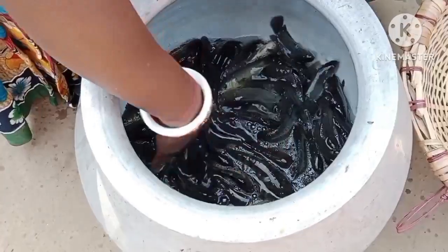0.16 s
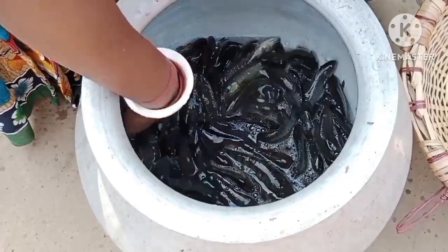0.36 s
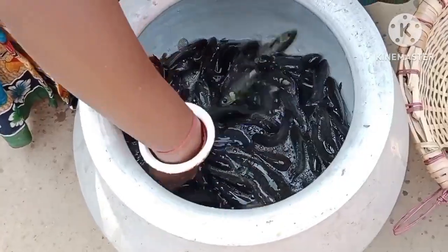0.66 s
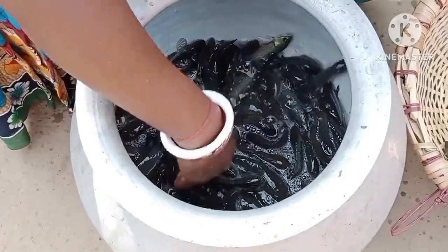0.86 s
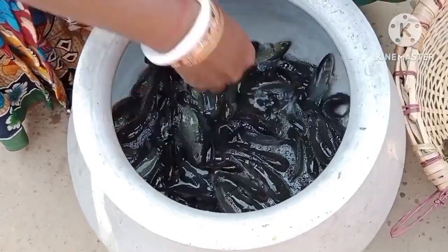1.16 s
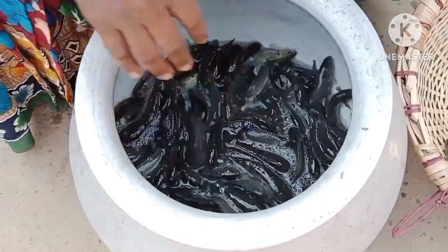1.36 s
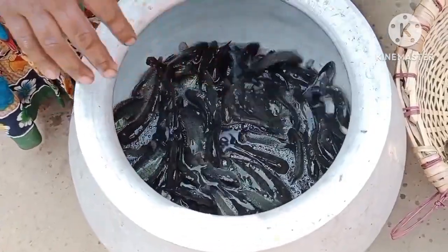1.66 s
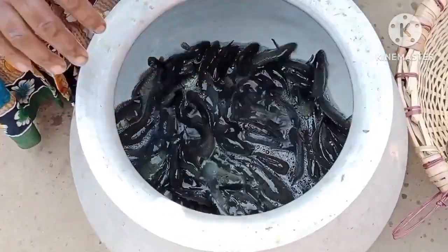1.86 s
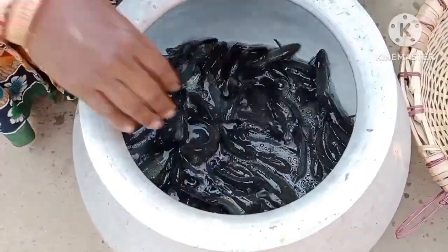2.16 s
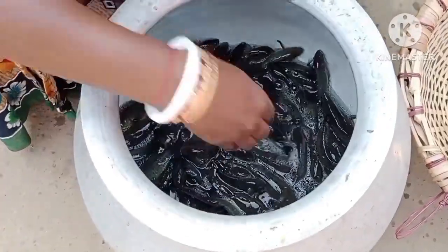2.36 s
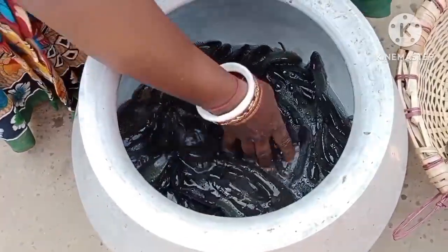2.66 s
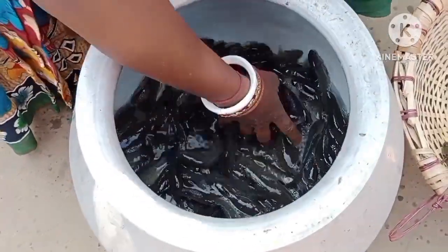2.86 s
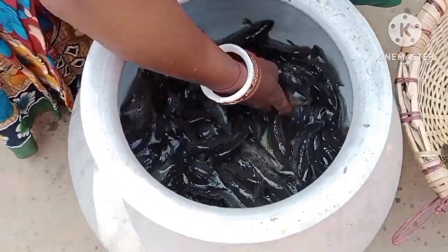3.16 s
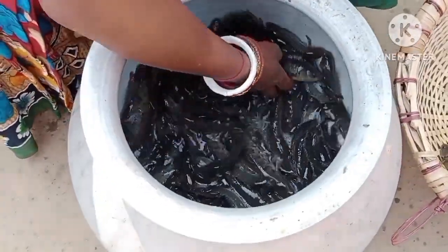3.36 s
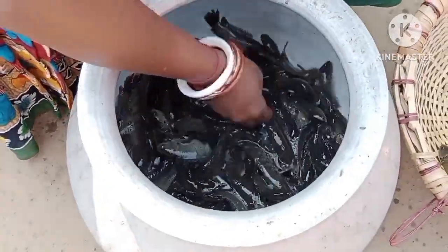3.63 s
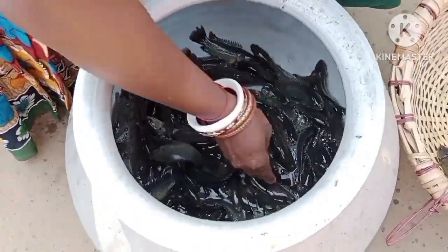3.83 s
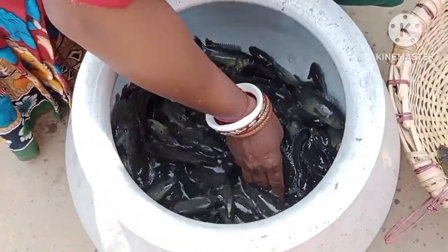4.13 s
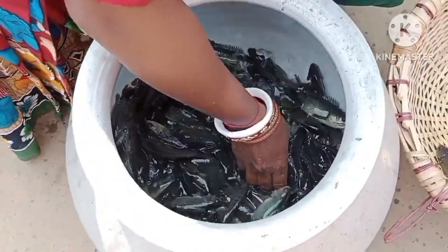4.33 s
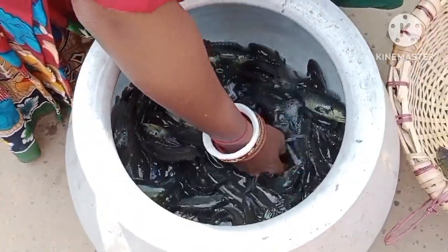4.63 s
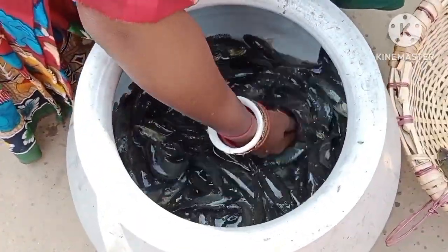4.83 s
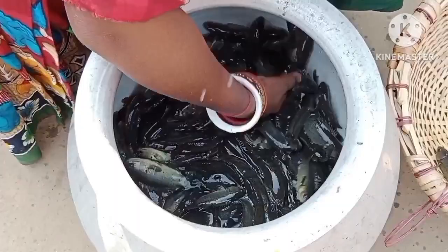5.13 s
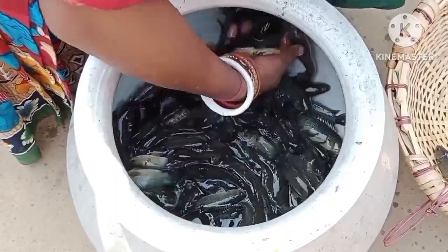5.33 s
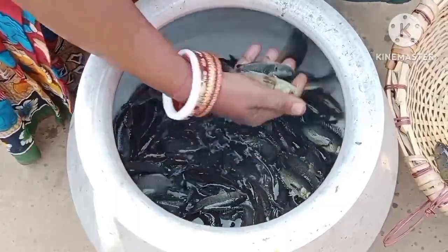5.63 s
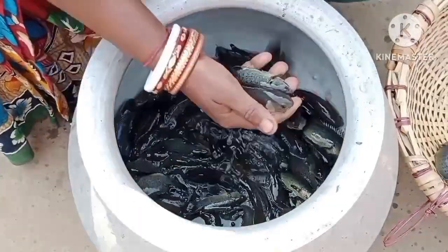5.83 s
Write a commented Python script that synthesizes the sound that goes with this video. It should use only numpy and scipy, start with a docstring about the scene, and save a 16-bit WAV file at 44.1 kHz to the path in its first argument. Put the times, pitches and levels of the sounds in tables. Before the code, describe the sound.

Close wet thrashing of fish in a metal pot: bubbly surges, sharp spray ticks and near-silent gaps, plus a single ringing knock near the start.

```python
"""A burst of gurgle and fizz comes first, one hard knock on metal at half a second, then more surges.
Place: outdoors, close above a metal pot where a hand gropes among live fish packed in shallow water.
Bubbles are chirped sines with noise, spray is ringing grains and hiss, the wall is a bank of decaying modes.
Behind them lie a faint shaped-noise hush and a low rumble.
The microphone is noise-suppressed and nearly mono, with a notch near 4 kHz and little above 8 kHz."""
import sys
import numpy as np
from scipy import signal
from scipy.fft import rfft, irfft
from scipy.io import wavfile
from scipy.ndimage import uniform_filter1d

SR = 44100
rng = np.random.default_rng(int(sys.argv[2]) if len(sys.argv) > 2 else 0)


def put_to_file(sound):
    """Save the sound as 16-bit audio at rate SR, in the file named by the first command-line argument."""
    columns = np.atleast_2d(sound).T  # one column per channel
    safe = np.clip(columns, -1, 1)
    whole_steps = np.round(safe * 32767)
    wavfile.write(sys.argv[1], SR, whole_steps.astype(np.int16))


N = 264159     # length in samples


def from_db(db):
    """Decibels to amplitude gain."""
    return 10 ** (np.asarray(db) / 20)


def rms_one(x):
    """Scale a signal to rms 1."""
    return x / np.sqrt(np.mean(x ** 2) + 1e-20)


def band(x, low_hz, high_hz):
    """Band-pass between two frequencies."""
    return signal.sosfilt(signal.butter(2, [low_hz, high_hz], "band", fs=SR, output="sos"), x)


def high_pass(x, order, hz):
    """Remove what lies below a frequency."""
    return signal.sosfilt(signal.butter(order, hz, "high", fs=SR, output="sos"), x)


def noise_band(length, low_hz, high_hz):
    """Band-passed white noise of rms 1."""
    return rms_one(band(rng.standard_normal(length), low_hz, high_hz))


def drift(rate_hz):
    """Slow random wandering of rms 1: white noise through two equal low-pass poles."""
    pole = np.exp(-2 * np.pi * rate_hz / SR)
    noise = rng.standard_normal(N + SR)
    # the first second lets the filter settle
    return rms_one(signal.lfilter([1], [1, -2 * pole, pole * pole], noise)[SR:])


def ring(drive, hz, t60):
    """A damped resonator: a unit click sets a sine of height 1 ringing."""
    radius = from_db(-60 / (t60 * SR))
    angle = 2 * np.pi * hz / SR
    poles = [1, -2 * radius * np.cos(angle), radius * radius]
    return signal.lfilter([0, np.sin(angle)], poles, drive + 1e-18)


def bursts(rows, rise, tone, octaves, attack_cycles, crack_db):
    """Each row: a tone whose pitch may climb as it dies, torn noise around that pitch, and a broad crack."""
    out, t = np.zeros(N + SR), np.arange(SR // 5) / SR
    noise = rng.standard_normal((len(rows), 2, len(t)))
    climbs = np.broadcast_to(rise, len(rows))     # pitch climb per t60, as a share of the start pitch
    for (s, peak_db, hz, t60), climb, (torn_noise, crack_noise) in zip(rows, climbs, noise):
        t60 = np.clip(t60, .006, .3)
        chirp = np.sin(2 * np.pi * hz * (t + climb * t * t / t60 / 2))
        low, high = hz / 2 ** octaves, min(hz * 2 ** octaves, 18000)
        torn = rms_one(band(band(torn_noise, low, high), low, high))
        attack = 1 - np.exp(-(t * hz / attack_cycles) ** 2)
        shape = attack * from_db(-60 * t / t60)
        crack_shape = (1 - np.exp(-t / .0007)) * np.exp(-t / .002)
        crack = from_db(crack_db) * band(crack_noise, hz / 2, 16000) * crack_shape
        share = np.clip(tone, 0, 1)
        at = round((s - attack_cycles / hz / 2) * SR)     # start early: the swell is under way at the given time
        out[at:at + len(t)] += from_db(peak_db) * (shape * (share * chirp + (1 - share) * torn) + crack)
    return out[:N]


def grains(per_s, low_hz, high_hz, cycles, spread_db, tilt_db, patch_db):
    """Many small bubbles ring at random moments; each size has busy spells; tilt is per octave; rms 1."""
    sizes = from_db(spread_db * np.minimum(rng.exponential(1, N), 4)) * rng.choice([-1, 1], N)
    born = rng.random(N) < per_s / SR
    pitches = np.geomspace(low_hz, high_hz, 20)
    dealt = rng.integers(0, 20, N)     # which pitch a bubble gets
    spells = drift(8.1)
    middle_hz = np.sqrt(low_hz * high_hz)
    out = np.zeros(N)
    for k, hz in enumerate(pitches):
        spell_db = patch_db * np.roll(spells, k * N // 20)
        busy = from_db(spell_db + tilt_db * np.log2(hz / middle_hz))
        clicks = sizes * born * busy * (dealt == k)
        out += band(ring(clicks, hz, cycles / hz), hz / 1.6, hz * 1.35)
    return rms_one(out)


def swells(rows, waver):
    """Tones that swell and fade, wavering in pitch and strength."""
    t, out = np.arange(N) / SR, np.zeros(N)
    wobble, flutter = np.cumsum(drift(24)) / SR, drift(58)
    for (s, peak_db, hz, length), phase in zip(rows, rng.uniform(0, 2 * np.pi, len(rows))):
        spread = length * np.where(t < s, .6, 1.2)     # quicker in than out
        shape = np.exp(-2 * ((t - s) / spread) ** 2)
        out += from_db(peak_db) * shape * np.sin(2 * np.pi * hz * (t + waver * wobble) + phase)
    return out * from_db(3.5 * flutter)


def cavity(x, t60, lags_s):
    """A few short feedback delays in parallel, of alternating sign: dense early echoes."""
    w = 2 * np.pi * np.fft.rfftfreq(N + SR, 1 / SR)
    echoes = 0
    for k, lag in enumerate(lags_s):
        one_trip = from_db(-60 * lag / t60) * np.exp(-1j * w * lag)
        echoes = echoes + (-1) ** k * (1 / (1 - one_trip) - 1)     # only the echoes, not the direct sound
    return irfft(rfft(x, N + SR) * echoes, N + SR)[:N]


# colour of the outdoor air: (frequency [Hz], density [dB per Hz, relative])
HUSH_COLOUR = [(18, -36.5), (30, -33.5), (119, 15), (881, -8), (1970, -2.5), (3680, -18.5), (4300, -13),
               (7240, -19.5), (8920, 0.5), (15000, -33.5)]


def hush():
    """Faint outdoor hush: noise shaped in frequency, its level wandering slowly."""
    hz, points = np.fft.rfftfreq(N, 1 / SR) + 1, np.array(HUSH_COLOUR)
    colour = from_db(np.interp(np.log(hz), np.log(points[:, 0]), points[:, 1]))
    air = rms_one(irfft(rfft(rng.standard_normal(N)) * colour, N))
    return from_db(-63.5 + 2 * drift(3.8)) * air


def rumble():
    """Far-off outdoor rumble: low noise with a wavering level."""
    return from_db(-70.5 + 1.4 * drift(20)) * noise_band(N, 48, 110)


# low lurches of the whole water mass: (time of the middle [s], level before flutter [dB], pitch [Hz])
LURCH_ROWS = [(0.022, -48.5, 130), (1.8, -46, 75), (2.118, -50, 80), (3.513, -60, 69), (3.87, -47.5, 53.3),
              (4.077, -43, 70.5), (4.792, -48, 66.4), (5.651, -51.5, 121), (5.792, -53, 85)]


def lurches():
    """The whole water mass heaves: brief low tones of strongly wavering pitch."""
    return swells([(*row, .05) for row in LURCH_ROWS], waver=0.14)     # length scale .05 s


# the wall rubbed by moving water:
# (time of the middle [s], level before flutter [dB], pitch [Hz], length scale [s])
WALL_TONE_ROWS = [(0.09, -45.5, 618, 0.074), (0.53, -29, 242, 0.027), (1.11, -57, 626, 0.048),
                  (1.39, -48, 618, 0.028), (1.88, -45, 634, 0.05), (2.165, -38.5, 625, 0.072),
                  (2.79, -59, 727, 0.054), (2.93, -59.5, 620, 0.11), (3.07, -53, 603, 0.13),
                  (3.19, -50.5, 713, 0.071), (3.32, -58, 967, 0.066), (3.56, -47.5, 623, 0.18),
                  (3.585, -28.5, 938, 0.035), (3.72, -51.5, 720, 0.11), (3.98, -51.5, 603, 0.15),
                  (4.2, -55.5, 1550, 0.21), (4.61, -49, 609, 0.059), (4.68, -57.5, 699, 0.41),
                  (5.07, -42.5, 605, 0.13), (5.28, -53.5, 586, 0.61), (5.37, -47.5, 1040, 0.4),
                  (5.43, -44, 678, 0.12), (5.6, -47.5, 1095, 0.19), (5.62, -48.5, 617, 0.2)]


def wall_tones():
    """The wall sings briefly where moving water rubs it: swelling tones of nearly steady pitch."""
    return swells(WALL_TONE_ROWS, waver=0.012)


# hard knocks on the wall of the pot: (time [s], level of the blow [dB])
KNOCK_ROWS = [(0.475, -0.5)]
# ringing modes of the wall: (frequency [Hz], level relative to the blow [dB], t60 [s])
WALL_MODES = [(244, -31, .2), (430, -39, .6), (628, -23, .3), (856, -34.5, 2.0), (972, -26, .22),
              (1205, -16.5, .4), (1436, -15.5, .45), (1723, -20, .16), (1855, -4, .19), (1950, -5, .21),
              (2030, -27, .35), (2266, -24, .26), (2460, -23, .33), (2649, -25, .33), (2864, -22, .2),
              (3332, -26, .26), (3515, -27, .22)]
RING_STOP_S = .72     # sloshing water stills the wall this long after a blow


def knocks():
    """A blow reaches every wall mode within a millisecond or two and shakes loose a clatter that dies fast."""
    out, t = np.zeros(N), np.arange(SR // 3) / SR
    sway = drift(8.6)     # sloshing water lets each mode swell and sink
    for s, blow_db in KNOCK_ROWS:
        at = round(s * SR)
        stilled = from_db(-500 * np.maximum(np.arange(N) / SR - s - RING_STOP_S, 0))
        delays = rng.integers(0, 60, len(WALL_MODES))     # samples
        for k, ((hz, level_db, t60), late) in enumerate(zip(WALL_MODES, delays)):
            drive = np.zeros(N)
            drive[at + late] = from_db(blow_db + level_db)
            mode_sway = from_db(2.2 * np.roll(sway, k * N // len(WALL_MODES)))
            out += stilled * mode_sway * ring(drive, hz, t60)
        clatter = noise_band(len(t), 1600, 3800)
        out[at:at + len(t)] += from_db(blow_db - 9.5 - 60 * t / 0.17) * clatter
        thud = noise_band(len(t), 300, 1000)     # the water shaken with the wall
        out[at:at + len(t)] += from_db(blow_db - 27 - 60 * t / 0.22) * thud
    return out


# surges of thrashing fish and stirring hand:
# (start time [s], hold [s], gurgle level [dB], fizz level [dB])
SURGE_ROWS = [(0.0, 0.0022, -23.5, -24), (0.027, 0.035, -31, -30), (0.136, 0.037, -41.5, -39.5),
              (0.342, 0.017, -48, -55.5), (0.403, 0.0046, -54, -45.5), (0.479, 0.08, -27.5, -46),
              (0.585, 0.18, -58, -56.5), (0.812, 0.032, -45, -45.5), (1.038, 0.073, -53, -47),
              (1.246, 0.031, -61, -59), (1.326, 0.026, -39, -34.5), (1.418, 0.07, -61.5, -69),
              (1.543, 0.16, -61.5, -56), (1.79, 0.078, -27, -24.5), (2.067, 0.063, -22.5, -25.5),
              (2.005, 0.034, -50, -41.5), (2.195, 0.05, -44, -46), (2.414, 0.025, -70.5, -62.5),
              (2.797, 0.0093, -50, -52.5), (2.901, 0.039, -40.5, -48.5), (3.027, 0.18, -46, -62),
              (3.142, 0.08, -49, -47), (3.495, 0.075, -26, -29), (3.772, 0.064, -37.5, -35),
              (3.913, 0.0066, -31, -34), (3.961, 0.005, -23.5, -25.5), (4.084, 0.12, -56.5, -43.5),
              (4.222, 0.086, -48, -49), (4.29, 0.02, -49, -49.5), (4.418, 0.015, -51, -66),
              (4.524, 0.016, -33.5, -38.5), (4.756, 0.027, -50.5, -61.5), (4.883, 0.18, -55.5, -60.5),
              (5.006, 0.04, -29.5, -36.5), (5.088, 0.073, -28, -28), (5.236, 0.13, -32.5, -40.5),
              (5.447, 0.17, -34, -46.5), (5.671, 0.099, -30.5, -35.5), (5.81, 0.21, -43, -56.5)]
CALM_GURGLE_DB, CALM_FIZZ_DB = -69.5, -68     # still water between surges
SWELL_DB_PER_S = 1592     # how fast a surge builds before its start
GURGLE_SETTLE_DB_PER_S, FIZZ_SETTLE_DB_PER_S = 188.5, 240.5     # how fast it dies after its hold


def surging():
    """Gurgle and fizz levels in dB: each surge builds fast, holds and settles; the strongest one counts."""
    t = np.arange(0, N / SR + .002, .001)
    s, hold, gurgle_db, fizz_db = np.array(SURGE_ROWS).T[:, :, None]
    early_db = SWELL_DB_PER_S * np.maximum(s - t, 0)
    late = np.maximum(t - s - hold, 0)
    gurgle_db = (gurgle_db - early_db - GURGLE_SETTLE_DB_PER_S * late).max(0)
    fizz_db = (fizz_db - early_db - FIZZ_SETTLE_DB_PER_S * late).max(0)
    gurgle_db = np.maximum(gurgle_db, CALM_GURGLE_DB)
    fizz_db = np.maximum(fizz_db, CALM_FIZZ_DB)
    return [np.interp(np.arange(N) / SR, t, db) for db in (gurgle_db, fizz_db)]


def slosh(gurgle_db):
    """Dull weight of the displaced water: low noise that follows the smoothed gurgle level."""
    level_db = uniform_filter1d(gurgle_db, size=1500) - 28 + 3.6 * drift(32)
    return from_db(level_db) * noise_band(N, 180, 520)


def fizz(fizz_db, flicks):
    """Fine spray: tiny high bubbles ring over a hiss of drops too fine to ring."""
    tiny = grains(1900, 4300, 8600, cycles=110, spread_db=2.5, tilt_db=1.5, patch_db=5.5)
    mist = from_db(-3.5 + 2.0 * flicks + 2.0 * drift(31)) * noise_band(N, 7200, 11500)
    return from_db(fizz_db + 3.5 * flicks) * (tiny + mist)


# colour of the gurgle, darkest at the end as the hand churns deeper: (time [s], tilt [dB per octave])
GURGLE_TILT_POINTS = [(0, 11), (2.6, 9), (2.802, 11), (3.298, 11.5), (3.448, 9.5), (4.951, 13), (5.202, 6),
                      (5.99, 6)]


def gurgle(gurgle_db, flicks):
    """Churned water: thousands of small bubbles a second, each a damped ring, with a moving spectral tilt."""
    tilt_db = np.interp(np.arange(N) / SR, *np.transpose(GURGLE_TILT_POINTS))
    bubbles = grains(5000, 950, 3850, cycles=80, spread_db=3.0, patch_db=5.5, tilt_db=tilt_db)
    return from_db(gurgle_db + 2.0 * flicks) * bubbles


# clear short tones, some steady, some climbing in pitch:
# (time [s], level [dB], start pitch [Hz], t60 before limiting to .006-.3 [s], climb per t60 [share of pitch])
CLEAR_TONE_ROWS = [(0.825, -33, 2370, 0.071, 0), (0.902, -9, 2320, 0.023, 1.96),
                   (0.907, -20, 2960, 0.03, 0), (1, -39.5, 2470, .12, 0.23), (1.047, -41, 2350, 0.11, 0),
                   (1.198, -41.5, 3560, 0.22, 0.23), (1.247, -44.5, 3765, 0.68, 0),
                   (1.255, -45.5, 5450, 0.16, 0), (2.869, -27, 1380, 0.046, 0.87),
                   (3.262, -39, 1650, 0.06, 0.075), (4.395, -19.5, 1540, 0.12, 0),
                   (4.397, -15.5, 1860, 0.04, 1.4), (4.486, -20.5, 1531, 0.32, 0),
                   (4.599, -17, 2460, 0.019, 1.2), (4.646, -16.5, 1523, 0.051, 0.17),
                   (5.578, -22, 3220, 0.037, 0.86), (5.773, -20.5, 3400, 0.026, 0.49)]


def clear_tones():
    """Clear short tones, some steady, some climbing in pitch: decaying sines with a little narrow noise."""
    return bursts([row[:4] for row in CLEAR_TONE_ROWS], rise=[row[4] for row in CLEAR_TONE_ROWS],
                  tone=.65, octaves=.12, attack_cycles=4.0, crack_db=-34.0)


# spray thrown off: (time [s], level [dB], centre frequency [Hz])
SPRAY_ROWS = [(0.0733, 3, 7220), (0.4473, -6.5, 9040), (0.4773, -20, 6000), (0.607, -24, 8600),
              (0.649, -27.5, 7960), (0.8265, -21.5, 6860), (0.949, -24.5, 7050), (1.084, -14, 7080),
              (1.363, -5, 7170), (1.557, -19, 6450), (1.621, -23.5, 4320), (1.768, -24, 6800),
              (1.8109, -9.5, 6900), (1.843, -6, 5500), (2.0492, -6.5, 6700), (2.065, -2, 7350),
              (2.453, -36.5, 6100), (2.796, -28, 5350), (2.8542, -25.5, 6440), (2.9254, -7.5, 8100),
              (3.0673, -22.5, 7950), (3.105, -12, 6770), (3.4423, -20.5, 9220), (3.488, -6.5, 7660),
              (3.5673, -4.5, 6680), (3.7798, -19, 5100), (3.7788, -9.5, 8100), (3.7997, -13.5, 4970),
              (3.962, -9.5, 6150), (3.983, -7.5, 7150), (4.007, -5, 6700), (4.2373, -21, 5840),
              (4.2557, -21, 6270), (4.311, -23.5, 5960), (4.336, -17.5, 5920), (4.348, -16, 4900),
              (4.442, -24, 6000), (4.524, -17.5, 7170), (4.5499, -10, 7830), (4.6, -21, 6970),
              (4.645, -25, 4600), (4.66, -33, 10600), (4.7768, -16.5, 6190), (4.9427, -24.5, 5550),
              (4.997, -12, 5480), (4.995, -9.5, 10140), (5.0053, -2, 4950), (5.1, -7.5, 5720),
              (5.1673, -7.5, 6380), (5.35, -14, 5740), (5.511, -10, 4640), (5.699, -6, 6660),
              (5.773, -12, 8600), (5.9436, -11, 8260)]


def spray():
    """Thrown spray ticks: short high bursts, more torn noise than tone, with a strong crack."""
    return bursts([(*row, .022) for row in SPRAY_ROWS],     # t60 .022 s
                  rise=0.044, tone=0.4, octaves=0.36, attack_cycles=7.0, crack_db=-13)


# air pockets closed by tail slaps and the hand:
# (time [s], level [dB], start pitch [Hz], t60 before limiting to .006-.3 [s])
PLOP_ROWS = [(0.0322, -6.5, 2670, 0.022), (0.073, -19, 1202, 0.065), (0.074, -8.5, 3900, 0.022),
             (0.1712, -26, 3810, 0.12), (0.1897, -24, 2670, 0.074), (0.3513, -16, 2540, 0.022),
             (0.412, -29, 2250, 0.1), (0.4746, -16, 3070, 0.051), (0.482, -7, 1970, 0.058),
             (0.562, -13, 1942, 0.087), (0.796, -26.5, 1300, 0.089), (0.8454, -13.5, 3350, 0.034),
             (0.888, -31.5, 1220, 0.15), (0.9198, -6, 3355, 0.032), (1.0416, -29.5, 3510, 0.075),
             (1.1099, -23.5, 3150, 0.05), (1.3311, -16.5, 2185, 0.04), (1.3622, -13.5, 1910, 0.084),
             (1.3618, -9.5, 2854, 0.063), (1.7694, -27, 3030, 0.074), (1.7858, -17, 3620, 0.02),
             (1.7961, -16, 2235, 0.12), (1.8155, 3, 1436, 0.013), (1.8326, -16, 2730, 0.092),
             (1.8643, -15.5, 3150, 0.051), (1.9025, -6.5, 1720, 0.023), (1.9507, -22.5, 2660, 0.036),
             (2.002, -29, 2410, 0.094), (2.0521, -21, 3720, 0.11), (2.084, -16, 2840, 0.066),
             (2.1145, -14, 1540, 0.12), (2.128, 2.5, 1506, 0.036), (2.131, 7.5, 953, 0.015),
             (2.132, -4, 2350, 0.029), (2.133, -1.5, 608, 0.03), (2.138, -15, 1650, 0.2),
             (2.156, -14, 3460, 0.045), (2.1995, -11, 970, 0.021), (2.2581, -25, 1840, 0.12),
             (2.2668, -27.5, 1314, 0.14), (2.3568, -43, 1630, 0.079), (2.6622, -45, 1526, 0.12),
             (2.801, -25, 2186, 0.078), (2.8472, -31, 1386, 0.11), (2.8944, -15.5, 2350, 0.017),
             (2.9324, -24.5, 1500, 0.04), (3.0588, -8.5, 2475, 0.032), (3.06, -35, 1280, 0.35),
             (3.0999, -10, 2604, 0.026), (3.1665, -23, 1590, 0.066), (3.207, -29, 1370, 0.067),
             (3.4455, -31, 2743, 0.097), (3.477, -29, 1697, 0.35), (3.509, -10, 2320, 0.02),
             (3.5248, 3.5, 2630, 0.021), (3.5463, 0.5, 2774, 0.025), (3.567, -13, 1680, 0.093),
             (3.7517, -18, 2000, 0.035), (3.7957, -8.5, 2150, 0.061), (3.7965, -13.5, 3260, 0.038),
             (3.794, -33.5, 1258, 0.25), (3.844, -15.5, 2690, 0.062), (3.9587, 1, 2086, 0.027),
             (3.982, -4.5, 2364, 0.056), (3.9962, -4.5, 2168, 0.044), (4.007, -18, 2100, 0.097),
             (4.0888, -24.5, 3000, 0.056), (4.1407, -17, 2590, 0.082), (4.1733, -24, 2170, 0.065),
             (4.232, -27.5, 2700, 0.048), (4.2928, -32.5, 2440, 0.26), (4.3155, -15, 2440, 0.041),
             (4.3377, -10, 2250, 0.022), (4.387, -28, 3030, 0.064), (4.4328, -21, 1924, 0.069),
             (4.4464, -16.5, 2990, 0.039), (4.488, -10.5, 3380, 0.02), (4.5146, -14, 1784, 0.14),
             (4.5174, -12, 2800, 0.012), (4.5496, -5, 3680, 0.044), (4.5588, -16.5, 1678, 0.14),
             (4.5752, -9.5, 1890, 0.031), (4.6107, -12.5, 2450, 0.028), (4.7759, -14.5, 4230, 0.028),
             (4.7787, -28, 2350, 0.11), (4.8709, -20, 2070, 0.08), (5.0056, 1, 4520, 0.021),
             (5.028, -28.5, 486, 0.17), (5.0855, -11, 3300, 0.022), (5.112, -28.5, 474, 0.062),
             (5.1286, -1.5, 3060, 0.016), (5.164, -7.5, 2980, 0.027), (5.165, -9.5, 1720, 0.048),
             (5.3504, -12.5, 2710, 0.028), (5.514, -19, 2280, 0.026), (5.679, -16, 3860, 0.04),
             (5.6938, -7.5, 2000, 0.031), (5.696, -8, 2900, 0.025), (5.741, -8.5, 1360, 0.016),
             (5.766, -33.5, 462, 0.19), (5.942, -10, 1850, 0.023), (5.9486, -9, 2980, 0.027)]


def plops():
    """Closed air pockets ring as bubbles of climbing pitch, mixed with torn water."""
    return bursts(PLOP_ROWS, rise=0.25, tone=0.6, octaves=0.26, attack_cycles=2.5, crack_db=-24.0)


def scene():
    """Water, wall and air heard from close above the pot, as left and right."""
    gurgle_db, fizz_db = surging()
    flicks = drift(36)     # quick tail flicks shake all bubble sizes together
    water = slosh(gurgle_db) + fizz(fizz_db, flicks) + gurgle(gurgle_db, flicks)
    water += clear_tones() + spray() + plops()
    # sound bouncing across the pot
    echoes = from_db(-26.0) * cavity(water, 0.13, [.0023, .0037, .0051, .0067, .0089])
    wet = high_pass(water + echoes + knocks(), 4, 170)     # small sources push no deep bass
    mid = hush() + rumble() + lurches() + wall_tones() + wet
    # the two channels differ only in loud treble bursts
    treble = high_pass(high_pass(mid, 8, 4300), 1, 9000)
    side = from_db(-9) * cavity(treble, .03, [.0021, .0033, .0047])
    loudness = np.sqrt(uniform_filter1d(treble ** 2, size=1024) + 1e-12)
    side *= np.minimum(loudness / from_db(-23), 1) ** 2     # the width shrinks as the treble grows quieter
    return np.array([mid + side, mid - side])


def suppress(x, noise_db, least_db):
    """Noise suppressor: faint short-time cells above 800 Hz are turned down, both channels alike."""
    hz, _, cells = signal.stft(x, SR, nperseg=512)
    size = uniform_filter1d(np.abs(cells).mean(0), size=3, axis=1) + 1e-12
    noise = (hz[:, None] > 800) * from_db(noise_db)
    gain = np.maximum(1 - noise / size, from_db(least_db))
    return signal.istft(cells * gain, SR, nperseg=512)[1][:, :N]


def record(dry):
    """Microphone: a dip near 4 kHz, noise suppression, a shelf down above 8 kHz, overload, a steep top cut."""
    notched = signal.lfilter(*signal.iirnotch(4150, 9, fs=SR), dry)
    quiet = suppress(notched, noise_db=-94, least_db=-10)
    hz = np.fft.rfftfreq(N, 1 / SR)
    shelf_db = np.interp(hz, [7400, 9000, 16000], [0, -17, -20])
    shelved = irfft(rfft(quiet) * from_db(shelf_db), N)
    both = shelved.mean(0)     # the overload acts on what both channels share
    loud = shelved - both + np.clip(both, -1, 1)
    return signal.sosfilt(signal.cheby2(12, 70, 16200, fs=SR, output="sos"), loud)


dry = scene()
out = record(dry)
put_to_file(out)
```